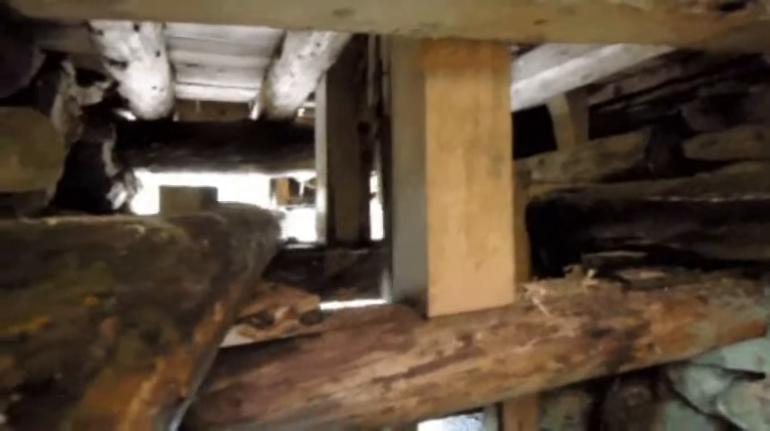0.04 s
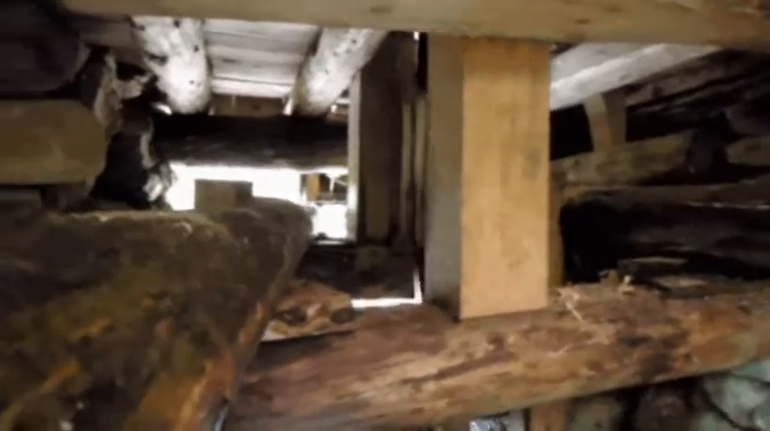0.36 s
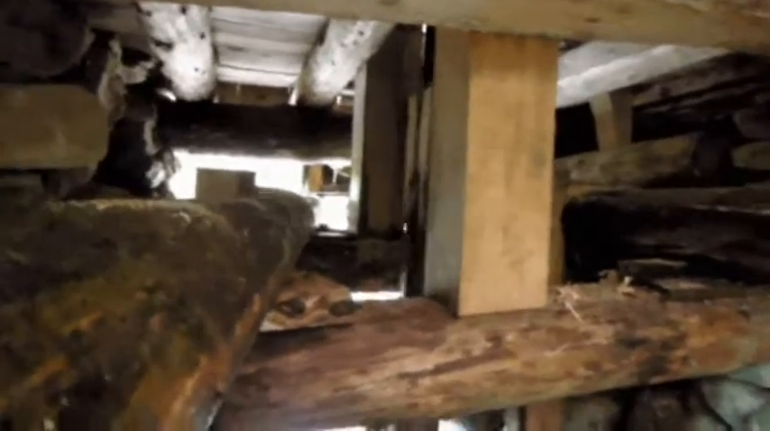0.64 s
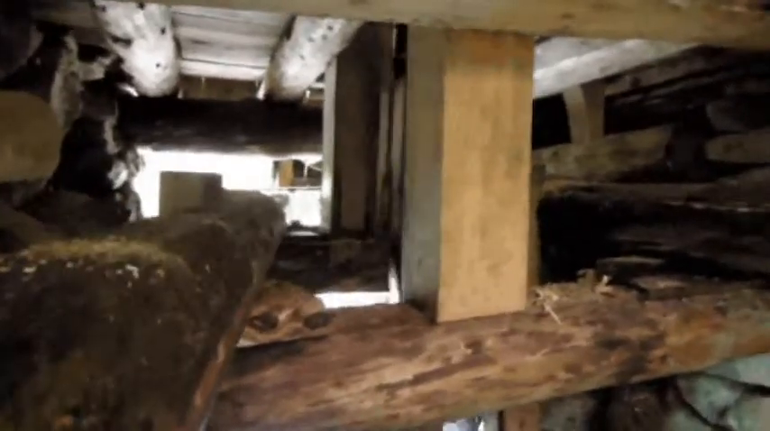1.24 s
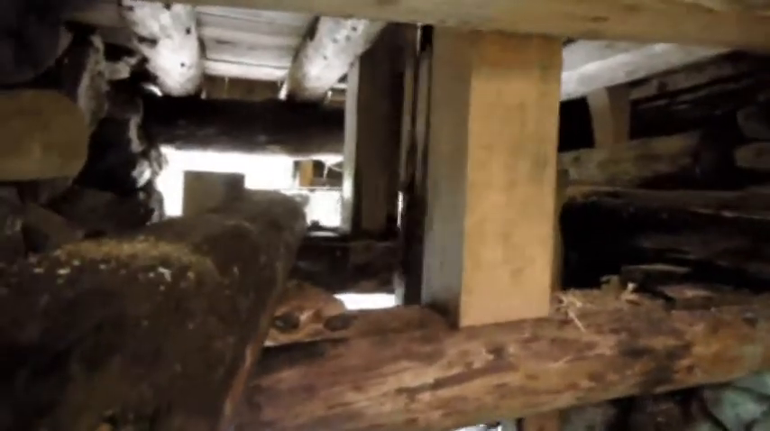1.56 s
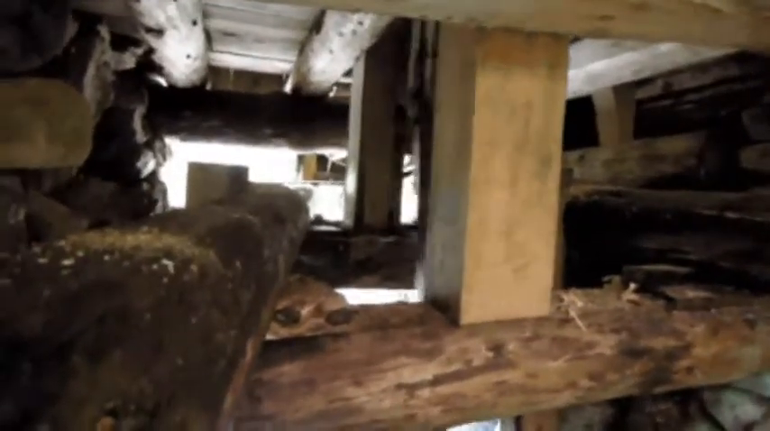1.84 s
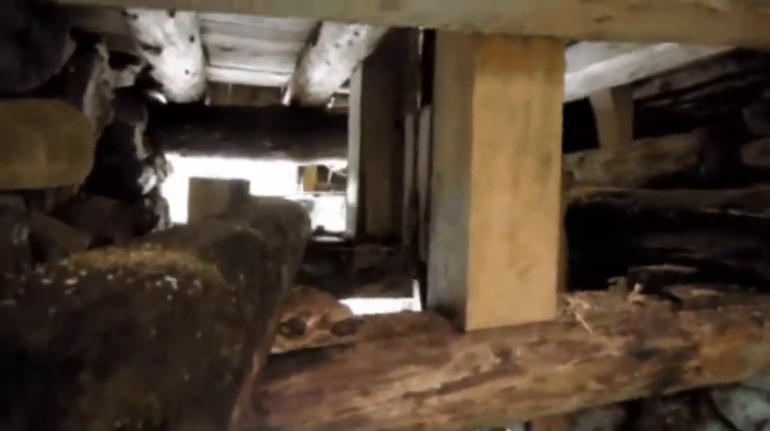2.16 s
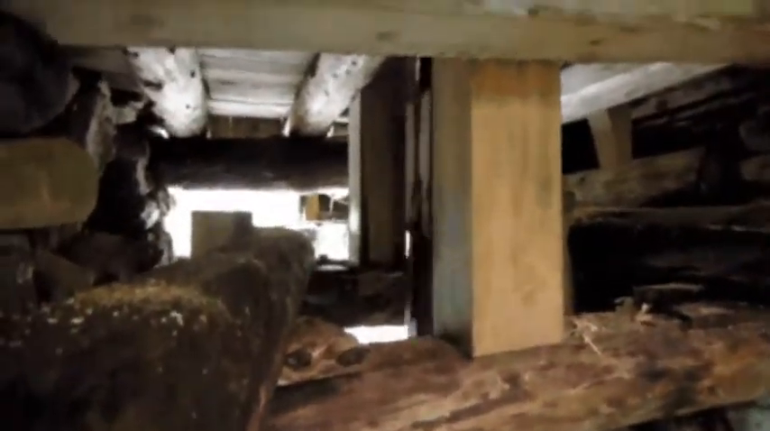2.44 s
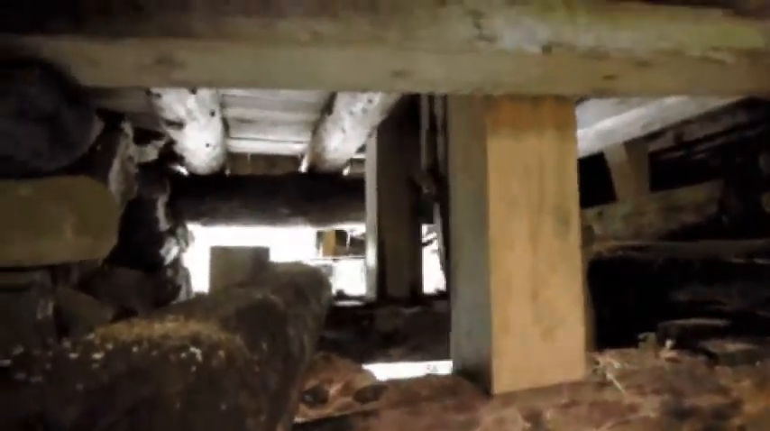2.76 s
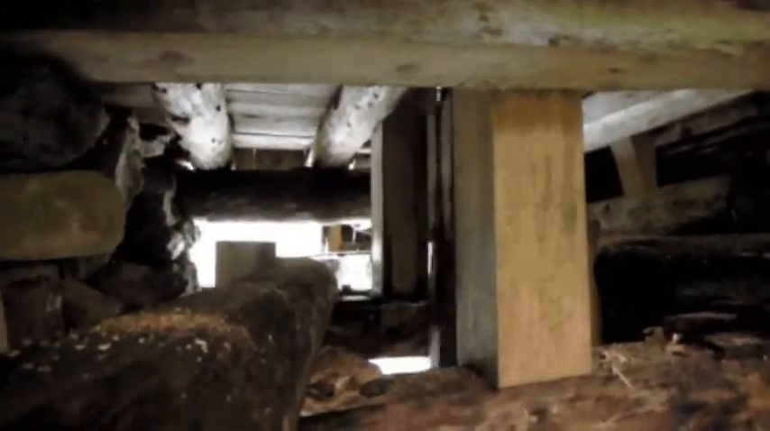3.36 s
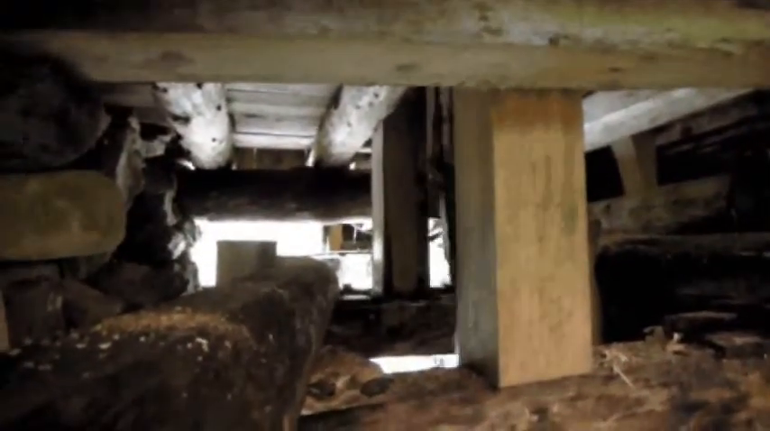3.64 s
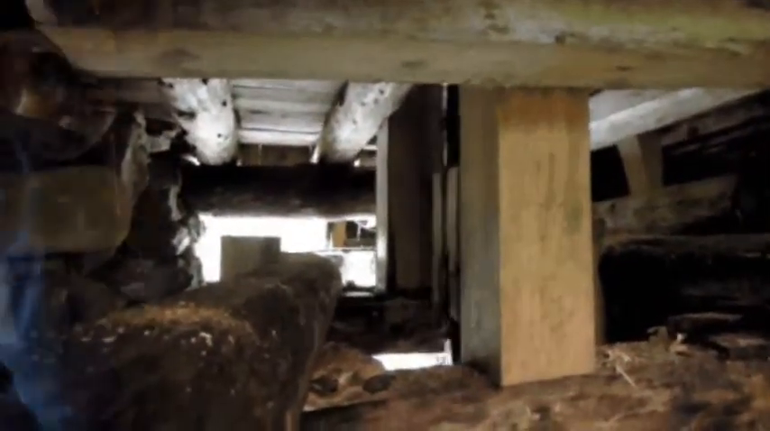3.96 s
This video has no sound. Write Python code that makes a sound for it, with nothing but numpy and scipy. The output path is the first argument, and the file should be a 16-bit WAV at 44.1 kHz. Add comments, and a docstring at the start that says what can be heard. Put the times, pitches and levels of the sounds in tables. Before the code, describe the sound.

A water-powered saw works steadily over rushing water in a wooden shed. Each stroke creaks, rasps louder and ends in a wooden thump, at about 0.5, 1.4, 2.3 and 3.1 seconds, followed by a lighter return scrape. Beams rumble and knock dully while loose irons jingle and clink throughout. A dry bearing squeaks briefly near 2.8 and 3.6 seconds as the sawing continues.

```python
"""Water-driven frame saw

A saw works in a timber mill, one stroke every 0.88 s, over rushing water. In each stroke a guide creaks
by friction, the teeth rasp ever louder, and a quick run of impacts thumps the wooden frame home.
The beams rumble and knock in their damped modes, and the building sways as the frame returns.
Loose irons jingle, a dry bearing squeaks now and then, and the shed adds a short reverberation."""
import sys
import numpy as np
from scipy import signal
from scipy.fft import rfft, irfft, next_fast_len
from scipy.io import wavfile
from scipy.ndimage import uniform_filter1d, map_coordinates

SR = 44100
rng = np.random.default_rng(int(sys.argv[2]) if len(sys.argv) > 2 else 0)


def waveform_to_disk(signal):
    """Save audio, clipped to [-1, 1], as 16-bit WAV at the path in sys.argv[1]."""
    frames = np.transpose(np.atleast_2d(signal))
    scaled = np.clip(frames, -1, 1) * 32767
    samples = np.round(scaled).astype(np.int16)
    wavfile.write(sys.argv[1], SR, samples)


N = 176400

# saw strokes: thump t/s, thump level/dB, its starting f/Hz, its fall/octaves,
# rasp level/dB, return scrape level/dB, rumble level/dB, creak level/dB
SAW_STROKES = [(-.373, -12, 1500, 2, -26, -21.5, -17, -36), (.507, -10, 1650, 2.53, -18.5, -29, -17.5, -32),
               (1.385, -10.5, 1290, 2.72, -25, -32.5, -20.5, -32),
               (2.26, -11.5, 1530, 2.5, -21, -30, -21.5, -20),
               (3.145, -14.5, 1700, 2.2, -24.5, -28.5, -19.5, -25),
               (4.025, -13, 1500, 2, -24, -28, -18.5, -27.5)]
# modes of the timber frame: f/Hz, level/dB, t60/s
TIMBER_MODES = [(91, -1.5, 0.12), (150, -5, 0.079), (193, 3.5, 0.042), (227.5, 1.5, 0.04),
                (283, -3.5, 0.12), (362, -4.5, 0.02), (399, -14.5, 0.18), (460, -26, 0.24),
                (683, -13, 0.12)]


def amp(db):
    """Amplitude ratio of a level in decibels."""
    return 10 ** (np.asarray(db) / 20)


def unit(x):
    """Normalisation to rms 1."""
    return x / np.sqrt(np.mean(x ** 2) + 1e-20)


def unit_burst(x):
    """Normalisation to rms 1 over the loudest 20 ms."""
    return x / np.sqrt(uniform_filter1d(x ** 2, size=SR // 50).max() + 1e-20)


def along(points, hz):
    """Interpolation of (f/Hz, value) points on a logarithmic frequency axis."""
    f, v = np.transpose(points)
    return np.interp(np.log(hz + 1), np.log(f + 1), v)


def clock(size=N):
    """Sample times in seconds."""
    return np.arange(size) / SR


def swell(t, centre, width):
    """Gaussian envelope, 1/e at one width from the centre."""
    return np.exp(-((t - centre) / width) ** 2)


def add(track, s, x):
    """Superposition of x on the track from second s."""
    i = round(s * SR)
    a, b = max(i, 0), min(i + len(x), len(track))
    if b > a:
        track[a:b] += x[a - i:b - i]


def wobble(rate, size=N):
    """Smooth random modulation: a spline through `rate` values a second."""
    knots = rng.standard_normal(size * rate // SR + 4)
    return map_coordinates(knots, [np.arange(size) * rate / SR])


def grit(rough_db, rate, size=N):
    """Random amplitude modulation clumps white noise into grains."""
    return rng.standard_normal(size) * amp(rough_db * np.clip(wobble(rate, size), -2, 2))


def patchy(x, depth_db):
    """Random gain over time and frequency: brief narrow resonances come and go."""
    z = signal.stft(x, nperseg=512)[2]
    field = uniform_filter1d(rng.standard_normal(z.shape), size=3, axis=0)
    field = unit(uniform_filter1d(field, size=9, axis=1))
    return signal.istft(z * amp(depth_db * field), nperseg=512)[1][:N]


def coloured(x, spectrum):
    """Spectral shaping by (f/Hz, level/dB) points, normalised to rms 1."""
    m = next_fast_len(N + SR // 2)
    gain = amp(along(spectrum, np.fft.rfftfreq(m, 1 / SR)))
    return unit(irfft(rfft(x, m) * gain, m)[:N])


def ring(drive, modes, scatter_db=1, detune=0):
    """Modal response: a sum of driven, damped resonators with random scatter."""
    out = 0
    for hz, db, t60 in modes:
        r = np.exp(-np.log(1000) / (t60 * SR))
        angle = 2 * np.pi * hz * (1 + detune * rng.standard_normal()) / SR
        mode = signal.lfilter([1, 0, -1], [1, -2 * r * np.cos(angle), r * r], drive)
        out = out + amp(db + scatter_db * rng.standard_normal()) * unit(mode)
    return out


def diffuse_ring(x, decay):
    """Densely overlapping modes: convolution with noise decaying by (f/Hz, t60/s) points."""
    hz, t, z = signal.stft(rng.standard_normal(SR // 3), SR, nperseg=256)
    damping = np.exp(-np.log(1000) * t / along(decay, hz)[:, None])
    tail = signal.istft(z * damping, SR, nperseg=256)[1]
    return signal.fftconvolve(x, tail / np.linalg.norm(tail))[:len(x)]


def each_stroke(shape, levels_db):
    """Cyclic envelope: one shape repeated at each stroke's own level."""
    s, db = np.transpose(shape)
    return sum(amp(level) * np.interp(clock() - thump_s, s, amp(db), left=0, right=0)
               for (thump_s, *_), level in zip(SAW_STROKES, levels_db))


def water():
    """Broadband flow noise: the mill race rushes steadily, with shifting spectral patches."""
    # rushing water, coloured by a microphone dip near 11 kHz: f/Hz, level/dB
    spectrum = [(20, 1), (50, -5), (100, -6), (250, -7), (500, -16), (720, -14.5), (950, -23.5),
                (2000, -23.5), (4000, -25), (8500, -25.5), (11000, -29.5), (12800, -26.5), (16000, -33)]
    return amp(-25.5) * coloured(patchy(grit(rough_db=1, rate=900), depth_db=2), spectrum)


def sway():
    """Low-frequency vibration: the building swings near 20 Hz after each reversal of the frame."""
    swings = [(-.29, .15, 18.5, -27), (.146, .08, 20.3, -15), (.352, .07, 21, -15.3)]  # wave packets: crest t/s from the thump, width/s, f/Hz, level/dB
    t = clock()
    return sum(amp(db) * swell(t, s + lag, width) * np.cos(2 * np.pi * hz * (t - s - lag))
               for s, *_ in SAW_STROKES for lag, width, hz, db in swings)


def timber_rumble():
    """Forced vibration: small knocks in the joints drive the frame's modes, most after each reversal."""
    envelope = [(-.44, -26), (-.3, -15.5), (-.22, -8.5), (-.12, -9), (-.03, -4), (.015, 3), (.05, -1.5),
                (.1, -0.5), (.17, -12), (.25, 2.5), (.3, -3.5), (.35, -6), (.46, -20)]  # rumble of one stroke: t/s from the thump, level/dB
    *_, rumble_db, _ = np.transpose(SAW_STROKES)
    return unit(ring(grit(rough_db=1.5, rate=200), TIMBER_MODES)) * each_stroke(envelope, rumble_db)


def beam_knocks():
    """Transient excitation: the load shifts and a beam's modes answer with a dull, ragged knock."""
    load_shifts = [(.445, -24, .012), (.755, -16, .022), (1.474, -18, .016), (1.64, -28, .025),
                   (2.045, -21, .015), (2.36, -22, .015), (2.5, -30, .02), (3.245, -16.5, .02),
                   (3.405, -17, .025), (3.49, -20, .02)]  # pushes on the beams: t/s, level/dB, width/s
    out, t = np.zeros(N), clock(SR // 3)
    dull = signal.butter(2, 470, fs=SR, output='sos')
    for s, db, width in load_shifts:
        push = rng.standard_normal(len(t)) * swell(t, 2 * width, width)
        knock = signal.sosfilt(dull, ring(push, TIMBER_MODES))
        add(out, s - 2 * width, amp(db) * unit_burst(knock))
    return out


def bearing_squeaks():
    """Friction tones: a dry bearing gives scratchy, falling chirps of three harmonics."""
    chirps = [(2.753, .04, 3150, 3080, -29), (2.81, .04, 2550, 2300, -36), (3.565, .075, 3200, 3050, -31),
              (3.638, .037, 2830, 2720, -28), (3.668, .035, 2550, 2420, -31)]  # squeaks: t/s, length/s, first f/Hz, last f/Hz, level/dB
    waver, flutter_db, harmonics_db = .022, 2.5, (0, -6, -11)
    out, t = np.zeros(N), clock(SR // 8)
    for s, length, first_hz, last_hz, db in chirps:
        progress = np.minimum(t / length, 1)
        glide_hz = first_hz + (last_hz - first_hz) * progress
        phase = 2 * np.pi * np.cumsum(glide_hz * (1 + waver * wobble(rate=1100, size=len(t)))) / SR
        envelope = amp(db + flutter_db * wobble(rate=150, size=len(t))) * np.sin(np.pi * progress)
        tone = sum(amp(level) * np.sin(k * phase) for k, level in enumerate(harmonics_db, 1))
        add(out, s, envelope * tone)
    return out


def rattles(events, modes, attack_s, release_s, scatter_db):
    """Contact chatter of iron on iron excites its main modes and a crowd of weak ones."""
    weak_mode_decay = [(1000, 0.04), (5000, 0.036), (15000, .05)]  # damping of the ironwork: f/Hz, t60/s
    tones, hiss, t = np.zeros(N), np.zeros(N), clock(SR // 3)
    bright = signal.butter(1, [5000, 13000], 'bandpass', fs=SR, output='sos')
    for s, db, length, hiss_db in events:
        envelope = (1 - np.exp(-t / attack_s)) * np.exp(-np.maximum(t - length, 0) / release_s)
        chatter = grit(rough_db=6.5, rate=700, size=len(t)) * envelope
        add(tones, s, amp(db) * unit_burst(ring(chatter, modes, scatter_db, detune=.0022)))
        add(hiss, s, amp(db + hiss_db) * unit_burst(signal.sosfilt(bright, chatter)))
    return tones + diffuse_ring(hiss, weak_mode_decay)


def iron_jingles():
    """Inharmonic ringing: the saw frame's loose irons rattle in high modes."""
    modes = [(3900, -13, .06), (5280, -12, .07), (6226, -1, .15), (6912, -9, .08), (7190, -9, .07),
             (8818, -5, .08), (9114, -2, .14), (9270, 0, .16), (10331, -10, .08), (10734, -11, .07),
             (11305, -10, .07), (11719, -12, .07), (12780, -3, .14), (12936, -3, .14), (13232, -6, .08),
             (14900, -13, .05)]  # loose iron: f/Hz, level/dB, t60/s
    jingles = [(.255, -22.5, 0.04, -8), (.498, -38, 0.025, -14), (.518, -16.5, 0.005, -5),
               (.565, -32, .03, -12), (.603, -23, 0.015, -12), (.805, -27, 0.016, -4),
               (1.125, -34, 0.025, -8), (1.157, -30.5, 0.019, 6), (1.368, -17.5, 0.031, 0.5),
               (1.397, -31, 0.0085, 8), (1.445, -27, 0.036, -2), (1.96, -31, 0.025, -13),
               (2.0, -27.5, 0.091, -6), (2.168, -27, 0.032, 4.5), (2.232, -23.5, 0.046, 3.5),
               (2.28, -20.5, 0.009, -9), (2.322, -33, 0.026, -6), (2.572, -28, 0.009, -3.5),
               (2.89, -28, 0.016, -17), (2.972, -23, 0.019, 0.5), (3.122, -22.5, 0.016, 4.5),
               (3.153, -20, 0.018, -7), (3.2, -30.5, 0.083, -3), (3.412, -26, 0.031, -10),
               (3.778, -19, 0.045, -26), (3.86, -30, .025, -1)]  # bursts of chatter: t/s, level/dB, length/s, relative hiss level/dB
    return rattles(jingles, modes, attack_s=0.0013, release_s=0.015, scatter_db=5)


def link_clinks():
    """Impact ringing: an iron link clinks as it takes up the return stroke."""
    modes = [(1720, -9, .05), (3690, -3, .07), (5070, -4, .09), (5510, 0, .11), (6080, -2, .11),
             (7400, -7, .07), (7840, -4, .08), (10400, -5, .09), (11650, -4, .1), (12800, -9, .1),
             (14300, -7, .06)]  # iron link: f/Hz, level/dB, t60/s
    clinks = [(.727, -27, 0.025, 4), (1.603, -31, 0.024, -0.5), (2.476, -22.5, 0.0098, -4),
              (3.364, -25.5, 0.03, -1.5)]  # bursts of chatter: t/s, level/dB, length/s, relative hiss level/dB
    return rattles(clinks, modes, attack_s=0.001, release_s=0.017, scatter_db=4)


def guide_creaks():
    """Sliding friction: the guide chafes and hoots early in the cut, and groans higher on the return."""
    chafe_spectrum = [(200, -28), (550, -4), (750, -3), (1200, 6), (1700, -26), (2500, -6), (5000, -26)]  # rubbing guide: f/Hz, level/dB
    chafe_db, groan_db = -29, -35
    groan_hz, groan_t60_s, hoot_hz, waver = 1600, .015, 745, .025
    out, t = np.zeros(N), clock()
    lowpass = signal.butter(4, 4000, fs=SR, output='sos')
    chafe = coloured(signal.sosfilt(lowpass, grit(rough_db=5.5, rate=500)), chafe_spectrum)
    groan = ring(rng.standard_normal(N), [(groan_hz, 0, groan_t60_s)])
    hoot_phase = 2 * np.pi * np.cumsum(hoot_hz * (1 + waver * wobble(rate=300))) / SR
    hoot = unit(np.sin(hoot_phase))
    for s, *_, hoot_db in SAW_STROKES[1:]:
        out += amp(chafe_db) * chafe * swell(t, s - .287, width=.03)
        out += amp(hoot_db) * hoot * swell(t, s - .263, width=.024)
        out += amp(groan_db) * groan * swell(t, s + .19, width=.03)
    return out


def frame_thumps(count=26):
    """Impact train: the frame judders home in wooden contacts of falling pitch that ring the guide post."""
    post_modes = [(258, -6, 0.085), (400, -7.5, 0.06), (499, -1, .07), (745, -7, 0.058), (1010, 6.5, 0.032),
                  (1104, -11, 0.031), (1320, -8, 0.053)]  # guide post: f/Hz, level/dB, t60/s
    lead_s, judder_s, decay_cycles, post_db = .021, .044, 0.64, -5
    out, t = np.zeros(N), clock(SR // 4)
    for s, db, first_hz, fall_octaves, *_ in SAW_STROKES:
        progress = (np.arange(count) + rng.random(count))[:, None] / count  # one row per contact
        age = np.maximum(t - judder_s * progress, 0)
        hz = first_hz * 2 ** (-fall_octaves * progress + 0.16 * rng.standard_normal((count, 1)))
        force = np.sqrt(np.sin(np.pi * progress) * hz) * swell(progress, 0.3, 0.99)
        force *= rng.choice([-1, 1], (count, 1))
        pulses = force * np.sin(2 * np.pi * hz * age) * np.exp(-hz * age / decay_cycles)
        judder = pulses.sum(axis=0)
        post = amp(post_db) * unit_burst(ring(judder, post_modes))
        add(out, s - lead_s, amp(db) * unit_burst(unit_burst(judder) + post))
    return out


def blade():
    """Cutting and friction noise: the teeth rasp through the log and scrape lightly on the way back."""
    rasp_spectrum = [(100, -10), (500, 3), (720, 2), (1000, 0), (1400, 1), (2500, -2.5), (4000, -5),
                     (7500, -5), (11000, -9.5), (16000, -10.5)]  # cutting teeth: f/Hz, level/dB
    rasp_envelope = [(-.45, -15), (-.35, -9.5), (-.3, -5), (-.2, -4), (-.1, -0.5), (-.035, 2.5), (-.015, 5),
                     (.015, 4), (.045, -10.5), (.09, -16.5), (.15, -19), (.3, -50)]  # the cut: t/s from the thump, level/dB
    scrape_spectrum = [(100, 2), (400, -7.5), (750, -5), (1300, 3), (1650, -10.5), (2200, 4), (3000, 2),
                       (3700, 4), (4500, 2), (7500, -4), (11000, -15), (16000, -11)]  # sliding teeth: f/Hz, level/dB
    scrape_envelope = [(.03, -23), (.09, 5), (.15, -13), (.2, 2.5), (.23, 0), (.3, -8.5), (.42, -22)]  # the return: t/s from the thump, level/dB
    flicker_db = 0.89
    *_, rasp_db, scrape_db, _, _ = np.transpose(SAW_STROKES)
    rasp = coloured(patchy(grit(rough_db=1.5, rate=1200), depth_db=3), rasp_spectrum)
    scrape = coloured(patchy(grit(rough_db=2.5, rate=800), depth_db=2.5), scrape_spectrum)
    cut = rasp * each_stroke(rasp_envelope, rasp_db)
    back = scrape * each_stroke(scrape_envelope, scrape_db)
    return (cut + back) * amp(flicker_db * wobble(rate=60))


def scene():
    """Superposition of machine and water; the brief contact sounds reverberate in the shed."""
    shed_decay = [(100, 0.083), (1000, 0.12), (5000, .16), (15000, 0.11)]  # reverberation time of the shed: f/Hz, t60/s
    irons = iron_jingles() + link_clinks()
    contacts = irons + frame_thumps() + beam_knocks() + guide_creaks() + bearing_squeaks()
    reverberation = amp(-11.5) * diffuse_ring(contacts, shed_decay)
    return (contacts + reverberation + blade() + timber_rumble() + sway() + water())[None]


def record(dry):
    """Soft saturation rounds the highest peaks; a sharp low-pass limits the bandwidth."""
    top_hz = 15800
    rounded = dry / (1 + np.abs(dry) ** 8) ** (1 / 8)
    m = next_fast_len(N + SR // 2)
    passband = np.fft.rfftfreq(m, 1 / SR) < top_hz
    return irfft(rfft(rounded, m) * passband, m)[..., :N]


dry = scene()
out = record(dry)
waveform_to_disk(out)
```